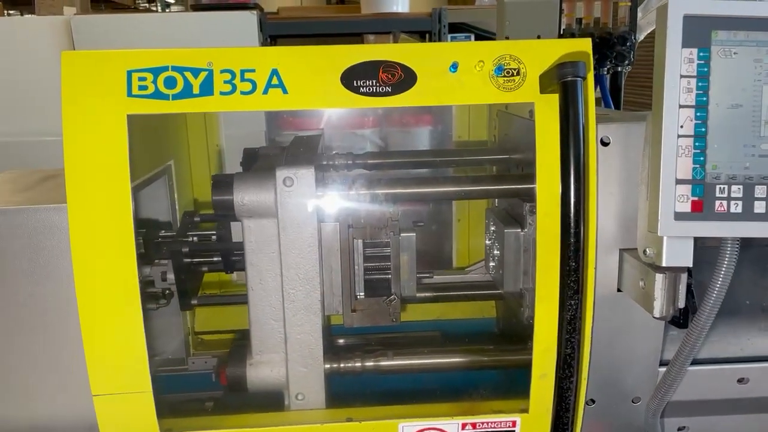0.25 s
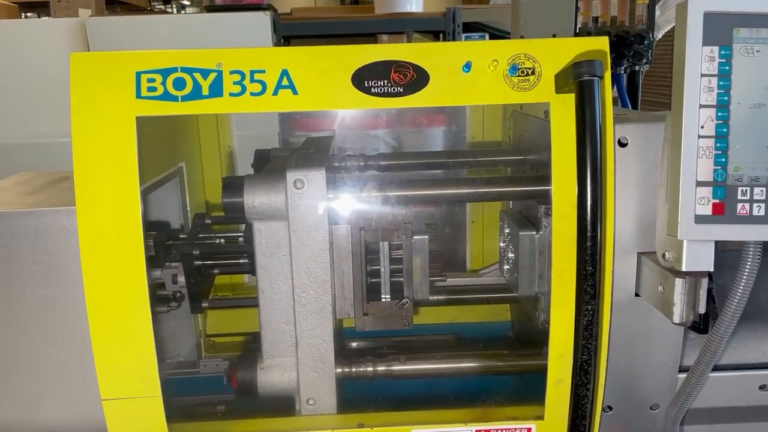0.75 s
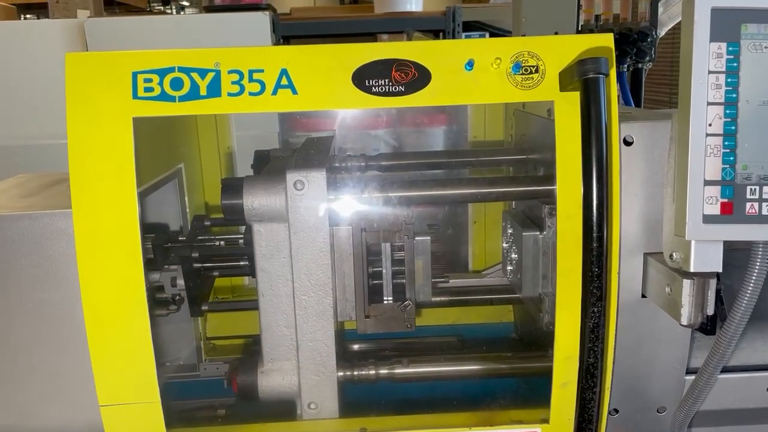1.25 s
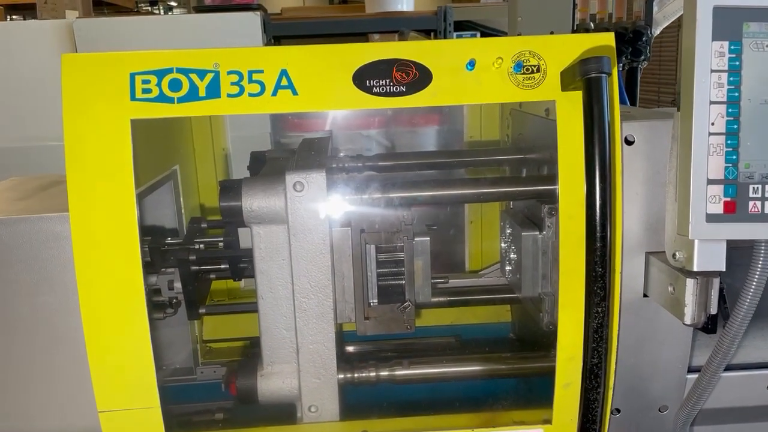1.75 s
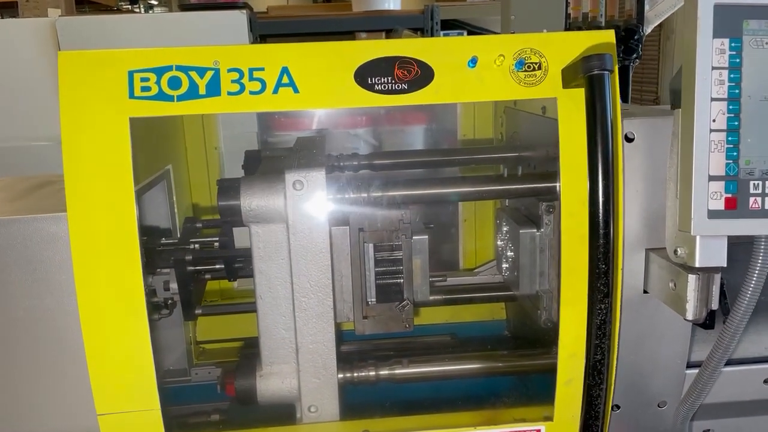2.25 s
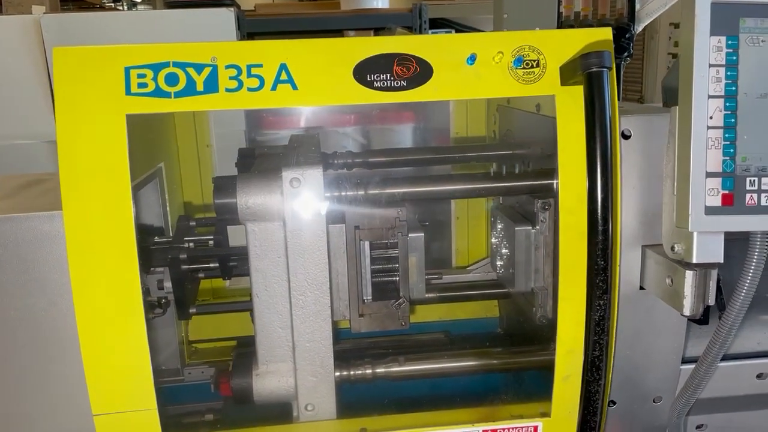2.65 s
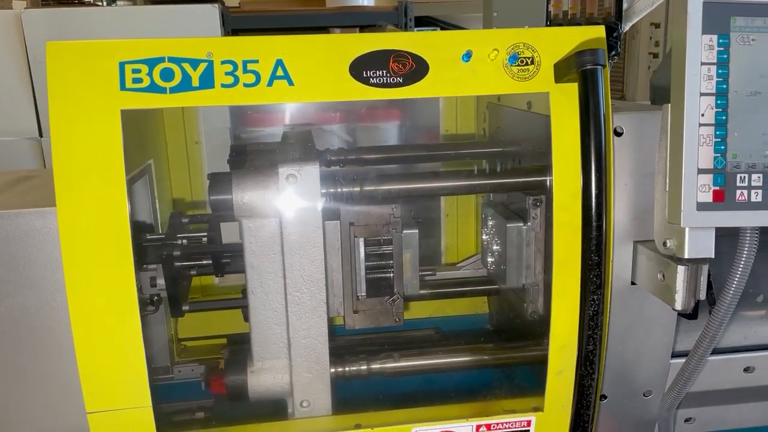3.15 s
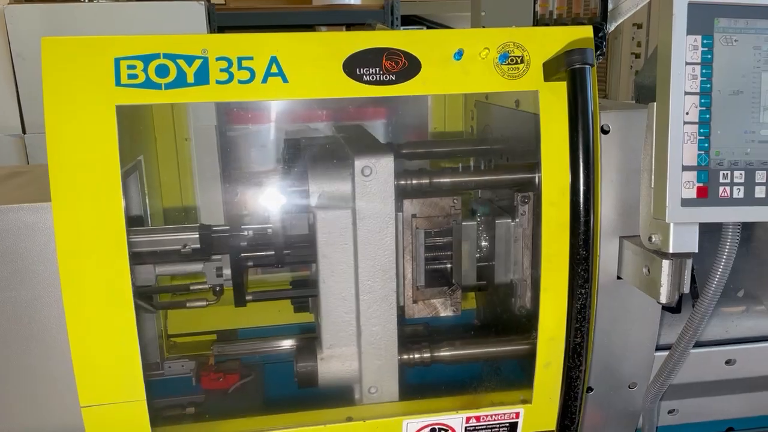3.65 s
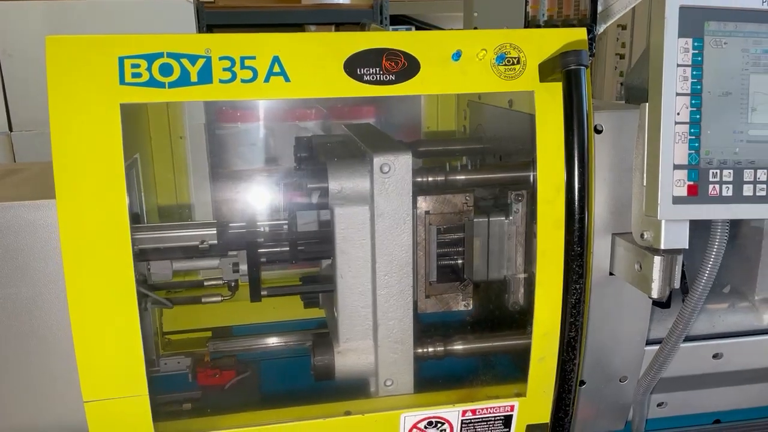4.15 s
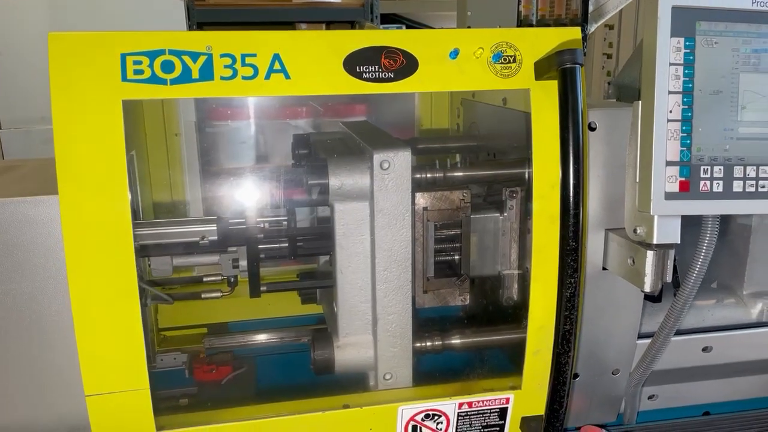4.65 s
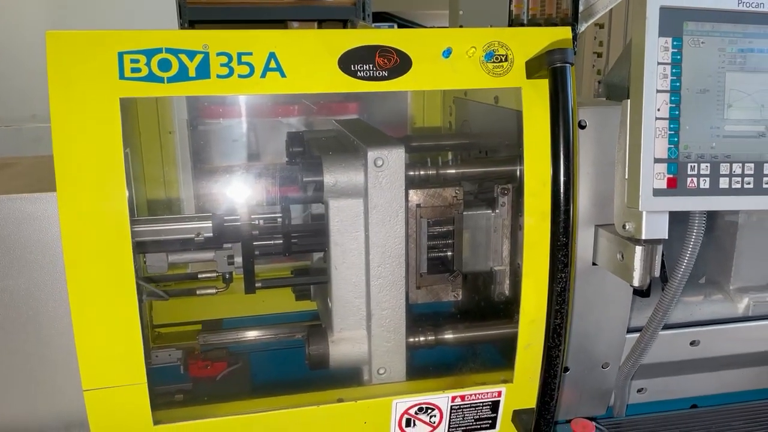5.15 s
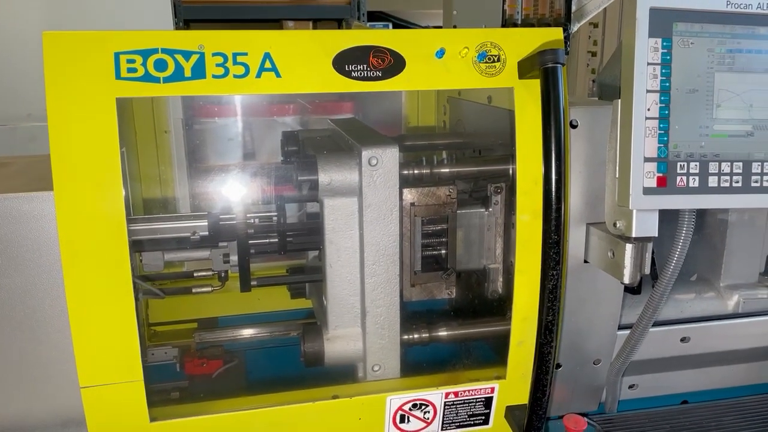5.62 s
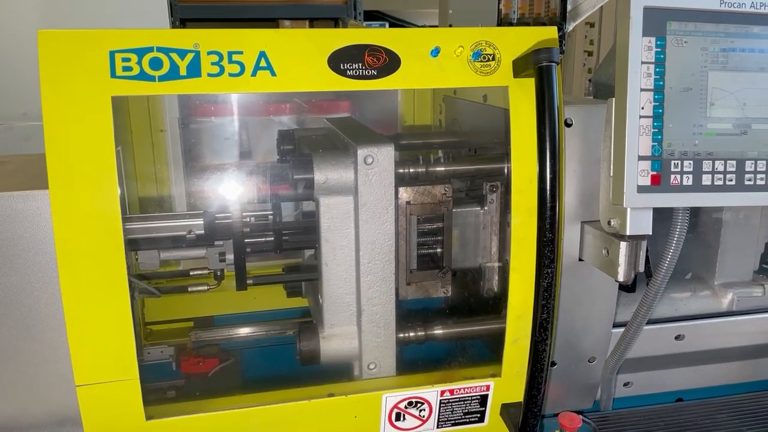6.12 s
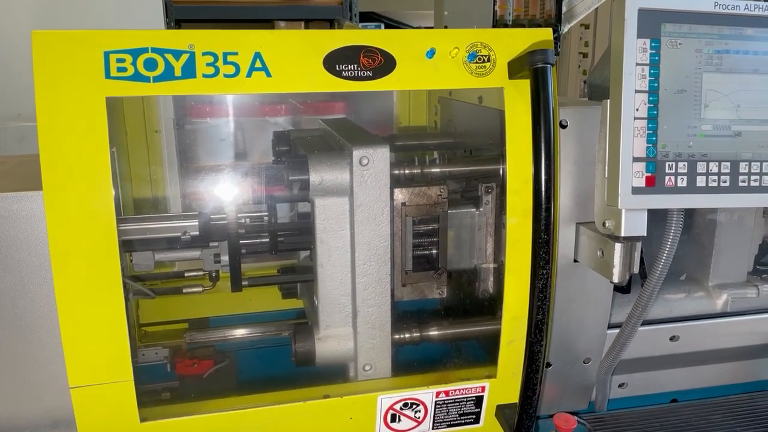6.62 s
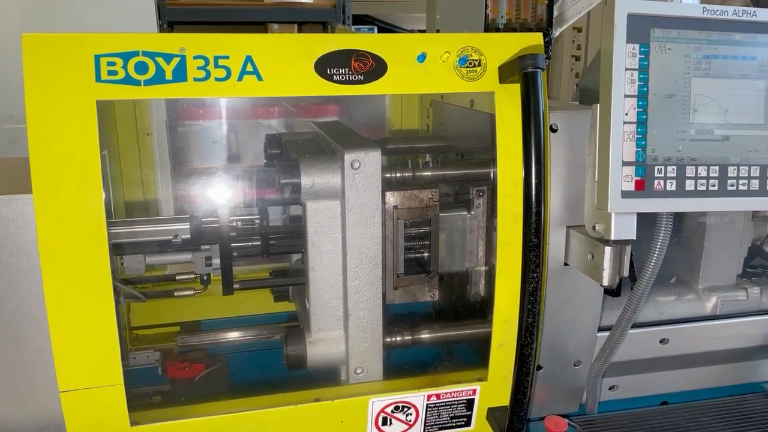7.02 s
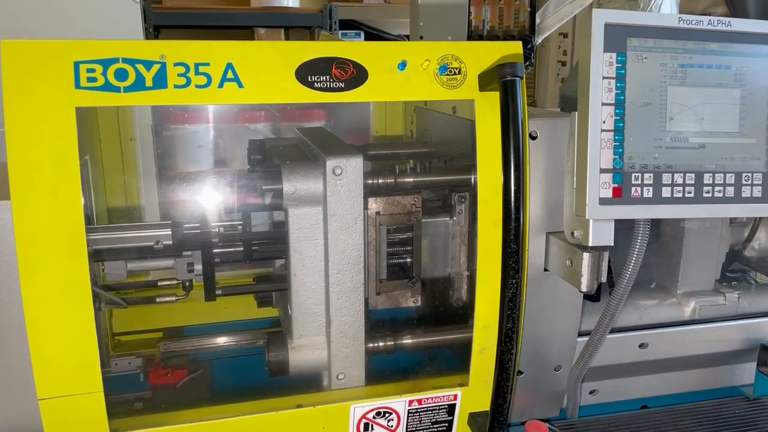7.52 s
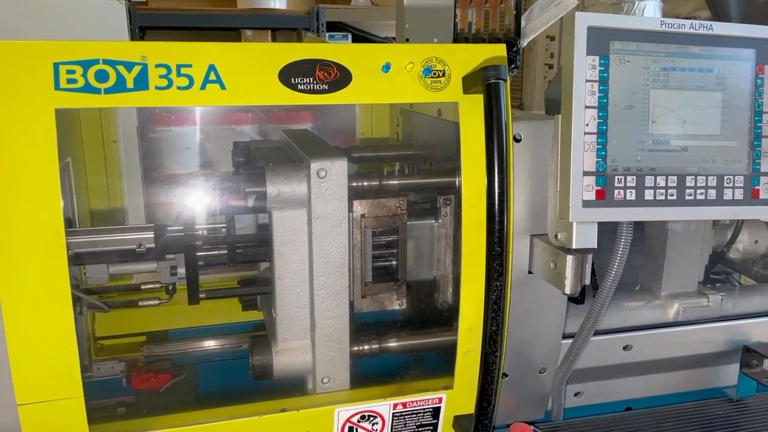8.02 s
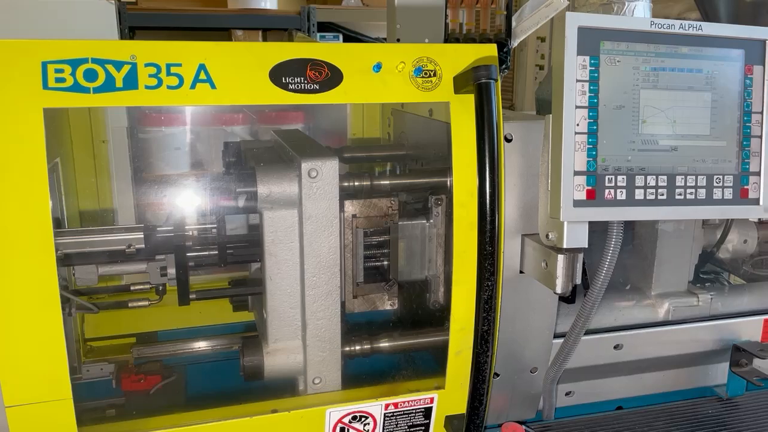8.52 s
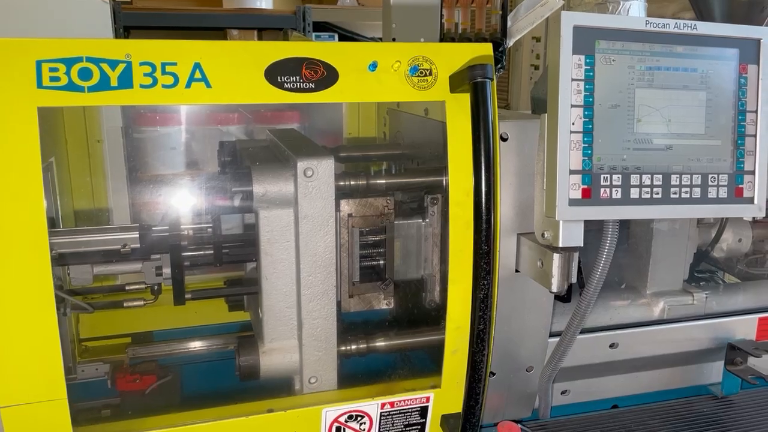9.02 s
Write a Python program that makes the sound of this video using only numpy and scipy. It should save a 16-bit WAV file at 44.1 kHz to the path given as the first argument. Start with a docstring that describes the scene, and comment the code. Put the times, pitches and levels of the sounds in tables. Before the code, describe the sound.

A steady low rumble of motors and fans under a tonal pump whine, heard close in stereo. Ejector and parts clatter metallically in the first second, followed by a dull thud and short valve hiss. After a calm pause the pump strains with hissing strokes and brief squeals, platens clunk, the whine swells for about a second, then falls back to an idle hum with faint whistling.

```python
"""Hydraulic moulding machine

A machine cycles in a workshop, heard close by on a two-port microphone. A piston pump, a comb of
sines, whines and sags under load; noise pulsing with the pump is oil hissing through valves, and
a valve sings as a wavering sine. Knocks by ejector, parts and platen and the shaking of each
stroke drive resonators of the steel frame, with some echo. Coloured noise is the deep drone of
motors and fans; thin sines are other motors."""
import sys
import numpy as np
from scipy import signal
from scipy.fft import rfft, irfft, next_fast_len
from scipy.io import wavfile
from scipy.ndimage import uniform_filter1d, map_coordinates

SR = 44100
rng = np.random.default_rng(int(sys.argv[2]) if len(sys.argv) > 2 else 0)


def voltage_ratio(level):
    """Linear amplitude factor for a level in decibels (scalar or array-like)."""
    return 10 ** (np.asarray(level, float) / 20)


def transcribe(u):
    """Save the signal u as a 16-bit wav file named by the first command-line argument.

    u: samples, shape (n,) or (channels, n), limited to [-1, 1]; the rate is SR.
    q: integer samples, one column per channel.
    """
    v = np.clip(np.atleast_2d(u).T, -1, 1)
    q = np.round(v * 32767).astype(np.int16)
    wavfile.write(sys.argv[1], SR, q)


N = 408807

# pump speed, sagging under load: time_s, piston_strokes_hz
PUMP_SPEED = [(0, 269.2), (3.0, 269.5), (3.1, 266), (3.2, 264.6), (3.35, 266), (3.5, 269.2), (4.3, 269.2),
              (4.45, 265), (4.6, 267), (5.05, 269.3), (5.65, 269.2), (5.98, 266.6), (6.3, 266),
              (6.92, 266.3), (6.96, 269), (9.27, 269)]
# two lowest pump tones, before waver and path offsets: time_s, tone_db, octave_db
PUMP_TONES = [(0.0, -46.5, -49), (1.3, -54.5, -46.5), (1.7, -52, -43), (2.9, -52.5, -44.5),
              (3.02, -42, -38), (3.12, -49, -30), (3.23, -41.5, -30), (3.43, -36, -31.5),
              (3.52, -46.5, -43), (4.25, -49, -47.5), (4.46, -34, -31), (4.56, -36, -35), (4.72, -34, -46),
              (4.83, -40, -34), (4.94, -37, -35), (5.02, -51, -48), (5.65, -47.5, -46.5),
              (5.81, -36.5, -33.5), (6.07, -34.5, -26), (6.92, -34.5, -28.5), (7.02, -41, -38.5),
              (9.27, -43.5, -45.5)]
# upper pump tones: multiple (rounded for pitch), rest_shared_db, rest_apart_db, loaded_shared_db, loaded_apart_db
PUMP_OVERTONES = [(3, -52.5, -48.5, -39.5, -41), (4, -65, -49, -42, -35.5), (5, -68, -51, -61, -56),
                  (6, -71, -48.5, -68, -45.5), (7, -65, -57.5, -55, -56), (8, -65.5, -53.5, -66, -54),
                  (9.1, -60.5, -66, -59, -56), (10.1, -65.5, -68, -57, -59), (11, -80, -73, -61, -53),
                  (12, -67, -68, -63, -60), (13, -67, -66, -66, -58), (14, -67, -67, -60, -61),
                  (15, -80, -84, -61, -64), (16, -64, -64.5, -59, -61), (17, -70, -76, -74, -68),
                  (18, -89, -70, -60, -64), (19, -74, -67, -68, -58), (20, -80.5, -62, -60, -60),
                  (22, -76, -64, -68, -55)]
# whistling of the sixteenth pump tone: time_s, added_db
PUMP_WHISTLE = [(0, 3), (1.0, 7), (1.7, 6.5), (2.9, 6.5), (3.2, -6), (3.7, 9), (4.1, -2.5), (5.9, -0.5),
                (6.1, 7), (6.65, 5), (6.75, -1), (6.92, -2), (6.97, 14), (7.4, 8.5), (8.0, 3)]
# valve strokes, relative hiss level: start_s, relative_db, hold_s, settling_s, opening_s
VALVE_STROKES = [(0.0, -50, 0.01, 0.19, .012), (0.323, -39, 0.015, 0.08, .008),
                 (0.446, -38.5, 0.059, 0.37, 0.018), (1.312, -43, 0.04, 0.27, 0.014),
                 (2.93, -39.5, 0.28, 0.59, 0.027), (3.493, -51.5, 0.35, 0.29, .02),
                 (4.303, -39, 0.22, 0.2, 0.062), (4.669, -40.5, 0.026, 0.43, .008),
                 (4.917, -41, 0.025, 0.11, .012), (5.481, -47, 0.56, 0.5, 0.013),
                 (5.8, -44.5, 1.1, 0.3, .15), (7.0, -52, 1.9, 1.8, .012)]
# colour of oil through the valves: freq_hz, relative_db_per_hz
HISS_COLOUR = [(300, -25), (1000, 0), (2500, -3.5), (3500, -7), (4250, 3), (4700, -6), (5200, 2),
               (5500, -5.5), (5950, 1.5), (6600, -5.5), (7500, -0.5), (9000, -0.5), (11000, 1.5),
               (12800, -1.5), (13800, -24), (14600, -9.5), (17000, -38)]
# narrow passages in the bright hiss: freq_hz, width_hz, added_db
HISS_PASSAGES = [(9550, 120, 3), (10150, 150, 3), (10550, 80, 3), (10930, 120, 6), (11290, 100, 8),
                 (11700, 120, 6), (11980, 70, 4)]
# colour of motors, fans and room air: freq_hz, relative_db_per_hz
DRONE_COLOUR = [(25, -46), (40, -20), (52, -1.5), (65, 3), (85, -4.5), (140, -8.5), (200, -16), (330, -21),
                (1000, -21.5), (1500, -31.5), (2500, -35.5), (4000, -48.5), (6000, -49.5), (9000, -43.5),
                (12500, -54.5), (13800, -81), (17000, -85)]
# thin tones of other motors, before waver: pitch_hz, level_db
MOTOR_TONES = [(716, -58), (915, -53), (966, -56), (1158, -57), (1206, -58.5)]
# strokes jolting the frame, relative drive: start_s, heavy_shudder_db, light_clatter_db, hold_s, settling_s
FRAME_JOLTS = [(0.0, -33.5, -44, 0.017, 0.13), (0.329, -35.5, -27, 0.14, 0.59),
               (0.72, -34.5, -35.5, 0.16, 0.26), (1.314, -30, -35, 0.02, 0.097),
               (2.93, -35, -35.5, 0.03, 0.25), (3.1, -36.5, -41.5, 0.18, 0.37),
               (4.316, -29, -30.5, 0.09, 0.29), (4.677, -25, -34.5, 0.04, 0.19),
               (4.923, -31.5, -40.5, 0.046, 0.087), (5.466, -35.5, -53, 0.042, 0.19),
               (6.84, -34, -40, 0.06, 0.16)]
# sharp contacts on light steel: start_s, relative_db, crack_relative_db, favoured_ring_hz, contact_s
STEEL_KNOCKS = [(0.3358, -22, -4.5, 1640, 0.03), (0.4512, -18, -16, 4350, 0.018),
                (0.4847, -7.5, -6.5, 1660, 0.0043), (0.4938, -11.5, -18, 1410, 0.003),
                (0.5525, -18.5, -18, 1840, 0.0079), (0.6493, -26, -18, 1850, 0.0069),
                (0.7328, -21.5, -13, 1440, 0.0081), (0.818, -26, -7.5, 1890, 0.006),
                (0.859, -21, -7, 1860, 0.0055), (0.8772, -19.5, -10, 1870, 0.0021),
                (0.9385, -29.5, -13, 1860, 0.006), (0.9935, -30, -21, 1900, 0.0046),
                (1.0871, -24.5, -25, 1870, 0.0014), (1.114, -36, -19, 1930, 0.004),
                (1.1333, -31.5, -12, 1700, 0.004), (1.2414, -37, -36, 1710, 0.0033),
                (1.3177, -31, -16, 4100, 0.0069), (1.3493, -25.5, -8.5, 1530, 0.011),
                (2.9402, -28, -12, 4290, 0.006), (2.9975, -27, -16, 2570, 0.016),
                (3.7895, -30, -17, 1200, 0.0083), (4.5318, -30.5, 5.5, 1230, 0.0099),
                (4.6801, -25, -10, 1200, 0.0069), (4.7145, -23, -7, 1260, 0.0084),
                (4.927, -34, -4.5, 1390, 0.017), (5.4895, -34.5, -9, 4200, 0.006)]
# dull contacts of heavy platens: start_s, relative_db, favoured_ring_hz, contact_s
PLATEN_THUDS = [(0.442, -17, 554, 0.0082), (0.458, -9.5, 450, 0.0035), (0.488, -10, 409, 0.0029),
                (0.792, -21, 490, 0.011), (1.341, -14.5, 566, 0.0067), (1.357, -16.5, 476, 0.005),
                (1.376, -20, 564, 0.006), (1.407, -21.5, 563, 0.0028), (2.954, -22.5, 280, 0.013),
                (4.43, -17.5, 503, 0.0077), (4.468, -12.5, 270, 0.0081), (4.533, -18.5, 515, 0.014),
                (4.682, -18.5, 835, 0.013), (4.718, -22, 730, 0.011), (6.889, -29.5, 533, 0.0074)]
# modes of steel frame and mould: freq_hz, relative_db, t60_s (capped in use)
FRAME_MODES = [(143, -2, 0.071), (258, -10, 0.12), (337, 0, 0.026), (409, -3.5, 0.049), (450, -2, 0.09),
               (549, 0, 0.055), (733, 1.5, 0.12), (940, 1, 0.051), (1200, 0.5, 0.033), (1325, -1, 0.045),
               (1525, 1, 0.11), (1728, 3, 0.032), (1928, 3, 0.027), (2200, 0.5, 0.03), (2585, -0.5, 0.09),
               (2970, -5, 0.054), (3460, -3.5, 0.015), (3910, -9, 0.073), (4350, -4.5, 0.12),
               (5060, -6.5, 0.045), (6420, -9.5, 0.055), (7080, -4.5, 0.049)]
# singing valve, before waver: start_s, level_db, hold_s, settling_s, pitch_hz
VALVE_SQUEALS = [(1.33, -47, 0.032, 0.27, 5110), (3.023, -46, 0.22, 0.3, 5090),
                 (4.36, -49, 0.1, 0.15, 5250), (4.673, -43, 0.027, 0.1, 5180)]
# microphone ports: freq_hz, likeness_0_to_1, left_lag_rad, left_minus_right_db
MIC_PORTS = [(60, 1, 0, -1), (265, 0.94, 0.5, -0.4), (490, 0.05, 0.7, -0.5), (840, 0, 0.66, -1),
             (1350, 0, .5, 0), (1870, 0.1, 1, 2), (2740, 0.22, .5, -1.5), (3340, 0.08, 0, -3.5),
             (5340, 0.13, .5, -3), (6870, 1, 1.4, -5.5), (7110, 0, -2.56, -4), (7670, 0.92, -2, 1.5),
             (8260, 0.99, -3, 3.5), (9470, 0.94, -4.5, -2), (10240, 1, -5, 0.5), (12700, .99, -9.5, 1),
             (12100, 0.9, -4.5, -9), (12550, 0.9, -9.5, -1), (14000, 0.93, -8.5, 1), (15300, 0.7, -7.5, -6)]


def in_time(rows):
    """Each column of a curve, sample by sample."""
    time_s, *columns = np.transpose(rows)
    return [np.interp(np.arange(N) / SR, time_s, column) for column in columns]


def at_hz(points, hz):
    """Each column of a spectrum, read on a log-frequency axis."""
    known_hz, *columns = np.transpose(points)
    return [np.interp(np.log(hz + 1), np.log(known_hz), column) for column in columns]


def drift(knots_per_s):
    """Slow random wander: a spline through normal knots of unit spread, held for 32 samples."""
    knots = rng.standard_normal(int(N / SR * knots_per_s) + 3)
    values = map_coordinates(knots, [np.linspace(0, len(knots) - 1, N // 32)], order=3)
    return values[np.arange(N) // 32 - 1]


def band(x, low_hz, high_hz):
    """Second-order Butterworth band-pass."""
    return signal.sosfilt(signal.butter(2, [low_hz, high_hz], "band", fs=SR, output="sos"), x)


def coloured_noise(spectrum, peaks=()):
    """Two unrelated noises of unit rms overall, with the given colour and bell-shaped peaks."""
    size = next_fast_len(N)
    hz = np.arange(size // 2 + 1) * SR / size
    shape_db = at_hz(spectrum, hz)[0]
    for centre_hz, width_hz, added_db in peaks:
        shape_db = shape_db + added_db * np.exp(-((hz - centre_hz) / width_hz) ** 2)
    noise = irfft(rfft(rng.standard_normal((2, size))) * voltage_ratio(shape_db), size)[:, :N]
    return noise / np.sqrt(np.mean(noise ** 2) + 1e-20)


def settling(start_s, level_db, hold_s, settling_s, opening_s=0.011, *, still_db):
    """Level of a run of strokes: each rises, holds, sinks toward stillness; the loudest counts."""
    age_s = np.arange(0, N + 32, 32)[:, None] / SR - start_s
    # a stroke at time zero is already open
    rise = np.clip(age_s / np.maximum(opening_s, 0.002) + (start_s <= 0), 0, 1)
    share = rise * np.exp(-np.maximum(age_s - hold_s, 0) / settling_s)
    coarse_db = still_db + np.max(share * (level_db - still_db), axis=1)
    return np.interp(np.arange(N) / 32, np.arange(len(age_s)), coarse_db)


def pump_phase():
    """Phase (rad) of the piston strokes, whose speed sags under load and wanders slightly."""
    return 2 * np.pi * np.cumsum(in_time(PUMP_SPEED)[0] + 0.1213 * drift(3)) / SR


def pump(phase, hiss_db):
    """Pressure ripple of the pistons: a comb of tones, mostly stronger under load and oil flow."""
    tone_db, octave_db = in_time(PUMP_TONES)
    idle_db, loaded_db, idle_flow_db, loaded_flow_db = -45.5, -26.5, -59, -45.5
    load = np.clip((octave_db - idle_db) / (loaded_db - idle_db), 0, 1)
    load = uniform_filter1d(load, size=4000)
    flow = np.clip((hiss_db - idle_flow_db) / (loaded_flow_db - idle_flow_db), -1.5, 1.2)
    waver_db = 2 * (1 - load)
    tone_db = tone_db + waver_db * drift(6) + [[0], [-3]]
    octave_db = octave_db + waver_db * drift(6) + [[0.5], [0]] + [[0], [5]] * (1 - load)
    tones = [(1, tone_db), (2, octave_db)]
    for multiple, *levels_db in PUMP_OVERTONES:
        rest_db, loaded_db = np.reshape(levels_db, (2, 2, 1))
        effort = load if multiple < 10 else np.maximum(flow, 0)
        level_db = rest_db + effort * (loaded_db - rest_db)
        # the highest tones die when the oil stands still
        level_db = level_db + 0.75 * max(multiple - 16, 0) * np.minimum(flow, 0)
        level_db = level_db + min(0.2 * multiple, 1.8) * drift(4.9)
        if round(multiple) == 16:
            level_db = level_db + in_time(PUMP_WHISTLE)[0]
        tones.append((multiple, level_db))
    out = np.zeros((2, N))
    for multiple, level_db in tones:
        angle = round(multiple) * phase + 2 * np.pi * rng.random()
        size = np.sqrt(2) * voltage_ratio(level_db[:, ::16]).repeat(16, axis=1)[:, :N]
        out += size * [np.sin(angle), np.cos(angle)]
    return out


def valve_hiss(phase, hiss_db):
    """Oil turbulence: bright coloured noise that opens with each stroke and pulses with the pump."""
    noise = coloured_noise(HISS_COLOUR, HISS_PASSAGES)
    beat = 1 + 0.068 * np.sin(phase)
    return voltage_ratio(hiss_db + 5) * noise * beat * voltage_ratio(1.3 * drift(11))


def drone():
    """Motors and fans: steady coloured noise whose deep part swells and sinks."""
    noise = voltage_ratio(-29.5) * coloured_noise(DRONE_COLOUR)
    return noise + band(noise, 30, 110) * (voltage_ratio(2.5 * drift(6)) - 1)


def motors():
    """Faint sines that waver in pitch, and in level apart on the two paths."""
    out = np.zeros((2, N))
    for pitch_hz, level_db in MOTOR_TONES:
        phase = 2 * np.pi * np.cumsum(pitch_hz + 1.497 * drift(3)) / SR
        waver_db = 3.1 * np.array([drift(2.5), drift(2.5)])
        out += np.sqrt(2) * voltage_ratio(level_db + waver_db) * [np.sin(phase), np.cos(phase)]
    return out


def contacts(table, rise_s):
    """A short noise burst for each contact, rising and dying exponentially: (start sample, burst)."""
    t = np.arange(SR // 5) / SR
    bursts = []
    for start_s, relative_db, *_, contact_s in table:
        envelope = (1 - np.exp(-t / rise_s)) * np.exp(-t / np.clip(contact_s, 0.001, 0.05))
        noise = rng.standard_normal((2, len(t)))
        bursts.append((round(start_s * SR), voltage_ratio(relative_db) * noise * envelope))
    return bursts


def add(track, bursts, gains):
    """Lays the bursts into the track."""
    for (at, burst), gain in zip(bursts, gains):
        track[:, at:at + burst.shape[1]] += gain * burst
    return track


def ring(mode, table, bursts, shaking):
    """One steel mode: a decaying two-pole resonator driven by stroke shaking and contacts."""
    hz, level_db, t60_s = mode
    heavy = hz < 1000
    relative_db, favoured_hz = np.array(table)[:, 1], np.array(table)[:, -2]
    offset = np.log(hz / favoured_hz)
    favour_db = 10 * np.exp(-(offset / 0.15) ** 2)
    favour_db = favour_db - 10 * np.maximum(-offset, 0) - 5 * np.maximum(offset, 0)
    reach_db = -28 if heavy else -33.5
    gains = voltage_ratio(reach_db + favour_db + 2 * rng.standard_normal(len(table)))
    drive = add(shaking.copy(), bursts, gains)
    # the first touch is a single clean push, which moves each mode its own way
    way = rng.choice([-1, 1], len(table))
    drive[:, [at for at, _ in bursts]] += way * gains * voltage_ratio(relative_db + [[21], [15]])
    t60_s = np.clip(t60_s, 0.01, 0.07 if heavy else 0.04)
    radius, step_rad = voltage_ratio(-60 / (t60_s * SR)), 2 * np.pi * hz / SR
    feedback = [1, -2 * radius * np.cos(step_rad), radius ** 2]
    return voltage_ratio(level_db - heavy * np.array([[0], [5]])) * signal.lfilter([0, np.sin(step_rad)], feedback, drive)


def frame():
    """Knocks, thuds and stroke shaking drive one set of steel modes and also radiate as plain noise."""
    start_s, heavy_db, light_db, hold_s, settling_s = np.transpose(FRAME_JOLTS)
    shudder_db = settling(start_s, heavy_db, hold_s, settling_s, still_db=-47)
    clatter_db = settling(start_s, light_db, hold_s, settling_s, still_db=-49)
    grains = rng.standard_normal((2, N)) * voltage_ratio(4.5 * drift(40))
    shudder, clatter = grains * voltage_ratio(shudder_db - 38), grains * voltage_ratio(clatter_db - 35)
    knocks = contacts(STEEL_KNOCKS, rise_s=0.000088)
    thuds = contacts(PLATEN_THUDS, rise_s=0.004)
    out = np.zeros((2, N))
    for mode in FRAME_MODES:
        if mode[0] < 1000:
            out += ring(mode, PLATEN_THUDS, thuds, shudder)
        else:
            out += ring(mode, STEEL_KNOCKS, knocks, clatter)
    light = voltage_ratio(clatter_db + 4) * rng.standard_normal((2, N))
    dull = voltage_ratio(shudder_db + 13) * rng.standard_normal((2, N))
    dull = add(dull, thuds, np.full(len(thuds), voltage_ratio(-4)))
    body = add(np.zeros((2, N)), knocks, np.full(len(knocks), voltage_ratio(1)))
    crack = add(np.zeros((2, N)), knocks, voltage_ratio(np.array(STEEL_KNOCKS)[:, 2] + 12))
    out += band(light, 530, 3700)
    out += band(dull, 215, 914) * voltage_ratio([[0], [-4]])
    out += band(band(body, 1200, 3800), 980, 4100)
    return out + band(band(crack, 7900, 12800), 4300, 11400)


def workshop(x):
    """Sixteen feedback delays, dying sooner toward the treble, different for the two paths."""
    size = next_fast_len(N + SR)
    hz = np.arange(size // 2 + 1) * SR / size
    t60_s = 0.5 / (1 + hz / 6000)
    echoes = np.zeros((2, len(hz)), complex)
    for k, lag_s in enumerate(rng.uniform(0.011, 0.042, size=16)):
        loop = voltage_ratio(-60 * lag_s / t60_s) * np.exp(-2j * np.pi * hz * lag_s)
        echoes[k % 2] += loop / (1 - loop) * (-1) ** (k // 2)
    return irfft(rfft(x, size) * echoes, size)[:, :N]


def squeal():
    """A valve sings as it opens: a sine with fast small wander of pitch and level."""
    *strokes, pitch_hz = np.transpose(VALVE_SQUEALS)
    level_db = settling(*strokes, still_db=-72)
    latest = np.maximum(np.searchsorted(strokes[0] * SR, np.arange(N)) - 1, 0)
    phase = 2 * np.pi * np.cumsum(pitch_hz[latest] + 25 * drift(60)) / SR
    size = np.sqrt(2) * voltage_ratio(level_db + 2.1 * drift(30) + [[0], [-2]])
    return size * [np.sin(phase), np.cos(phase)]


def scene():
    """Two paths to the microphone: what both ports share and what differs."""
    phase = pump_phase()
    hiss_db = settling(*np.transpose(VALVE_STROKES), still_db=-66.5)
    oil = pump(phase, hiss_db) + valve_hiss(phase, hiss_db) + squeal()
    steel = frame() * voltage_ratio([[0], [-1.5]])
    return oil + steel + voltage_ratio(-15.5) * workshop(steel) + drone() + motors()


def low_pass(x):
    """Removes everything above the highest recorded frequency."""
    return signal.sosfilt(signal.butter(12, 16310, fs=SR, output="sos"), x)


def record(dry):
    """Ports differ in likeness, phase lag and balance along the spectrum; peaks are rounded."""
    size = next_fast_len(N + 4096)
    alike, lag_rad, balance_db = at_hz(MIC_PORTS, np.arange(size // 2 + 1) * SR / size)
    alike = np.clip(alike, 0, 1)
    shared, apart = rfft(dry, size) * np.sqrt([(1 + alike) / 2, (1 - alike) / 2])
    tilt = voltage_ratio(balance_db / 2) * np.exp(-0.5j * lag_rad)
    ports = irfft([(shared + apart) * tilt, (shared - apart) / tilt], size)[:, :N]
    ports = 1.1 * np.tanh(ports / 1.1)
    return low_pass(ports)


dry = scene()
out = record(dry)
transcribe(out)
```